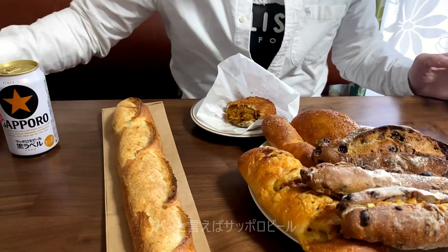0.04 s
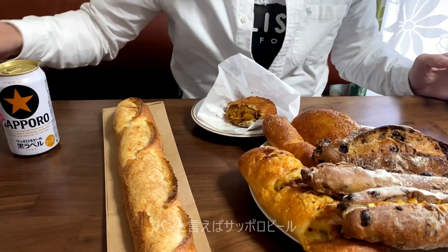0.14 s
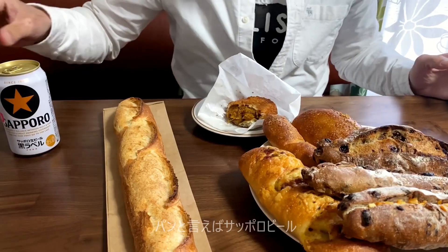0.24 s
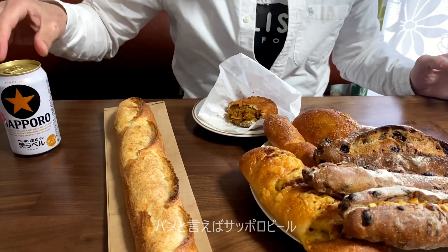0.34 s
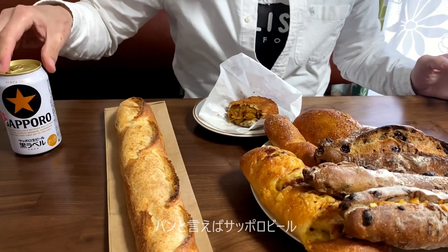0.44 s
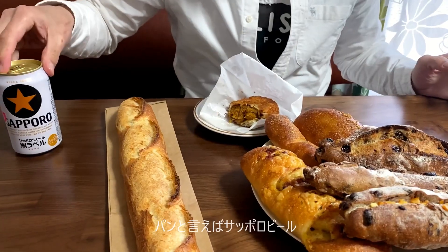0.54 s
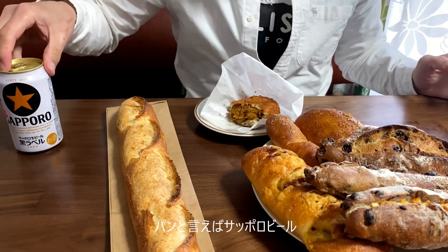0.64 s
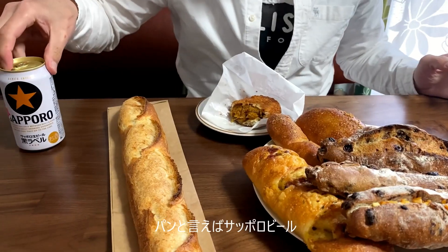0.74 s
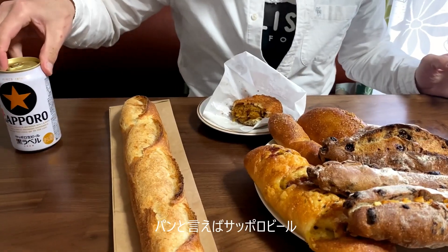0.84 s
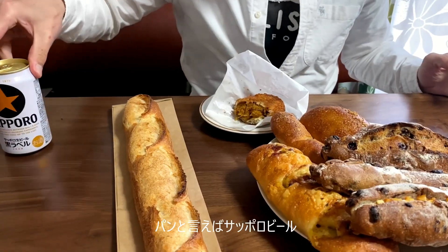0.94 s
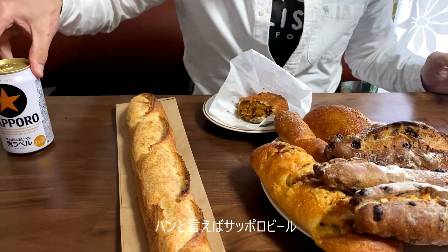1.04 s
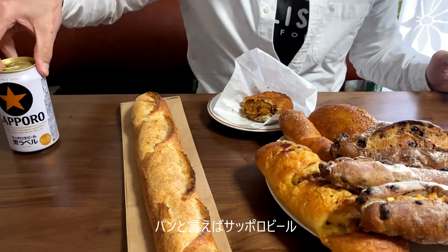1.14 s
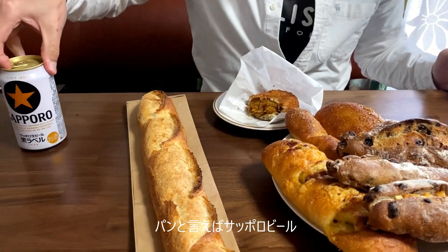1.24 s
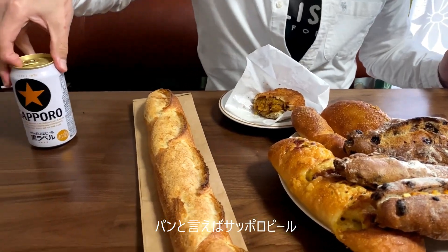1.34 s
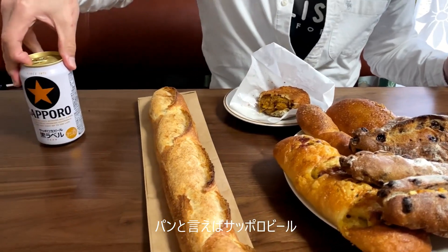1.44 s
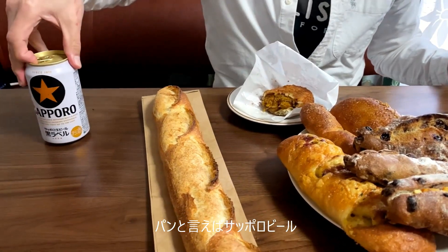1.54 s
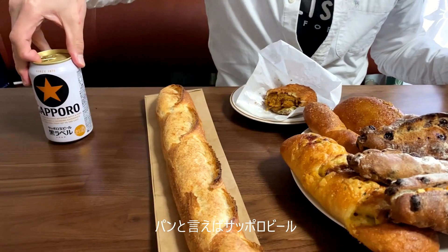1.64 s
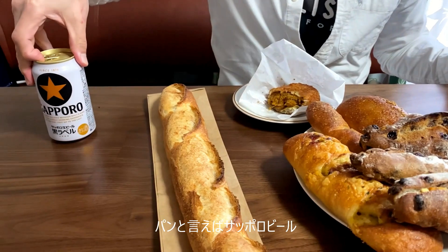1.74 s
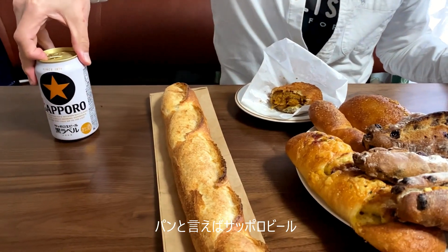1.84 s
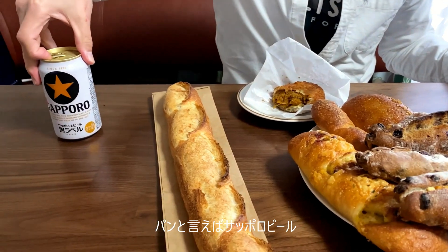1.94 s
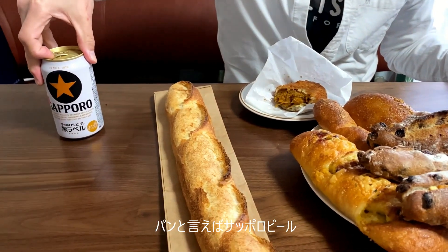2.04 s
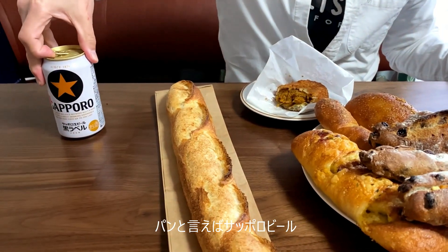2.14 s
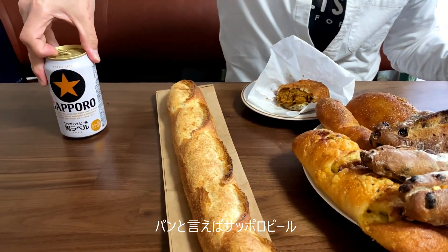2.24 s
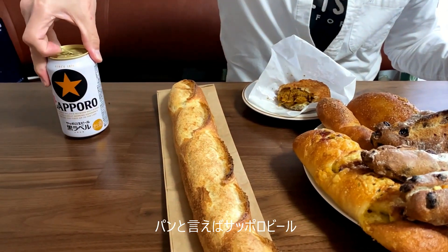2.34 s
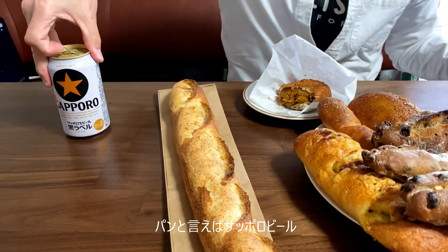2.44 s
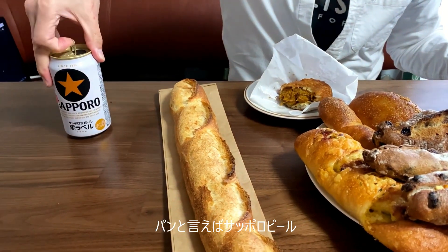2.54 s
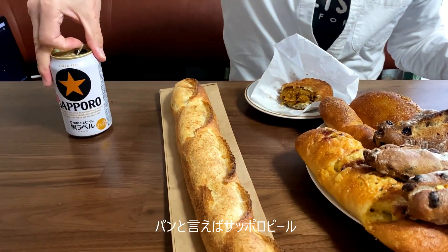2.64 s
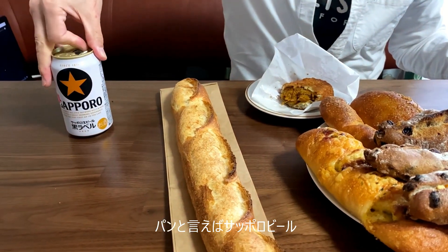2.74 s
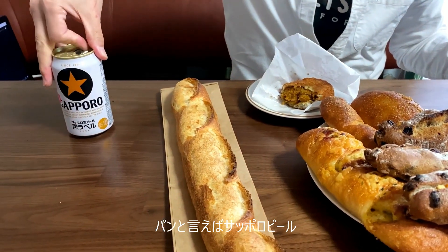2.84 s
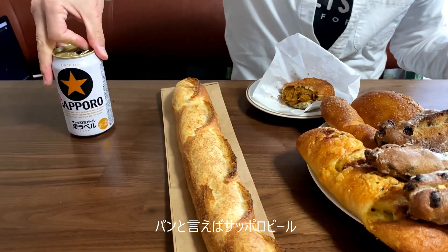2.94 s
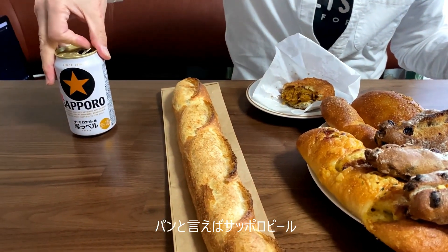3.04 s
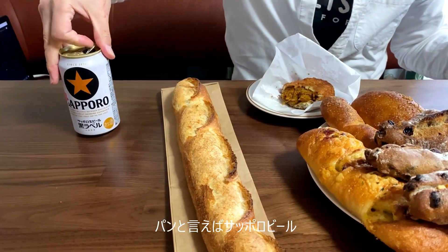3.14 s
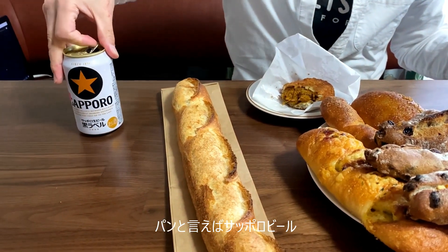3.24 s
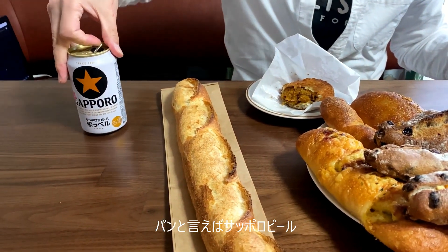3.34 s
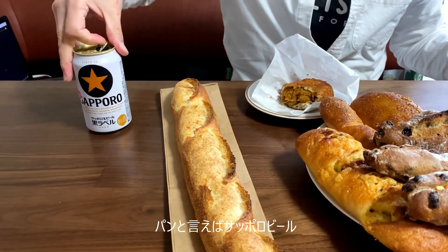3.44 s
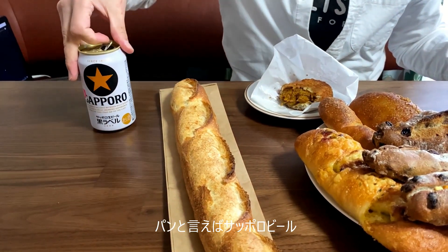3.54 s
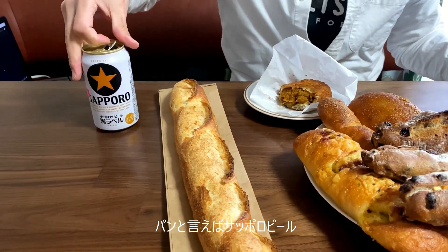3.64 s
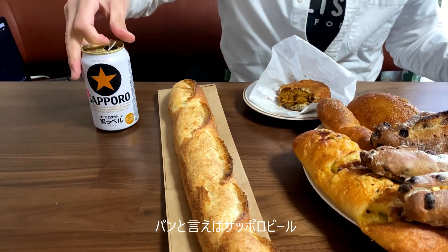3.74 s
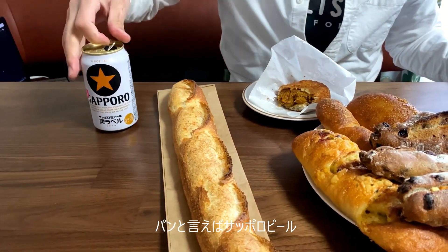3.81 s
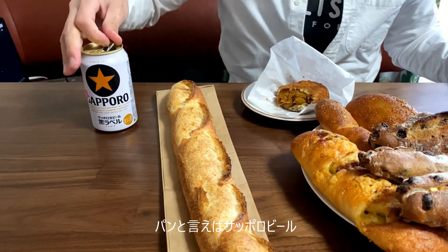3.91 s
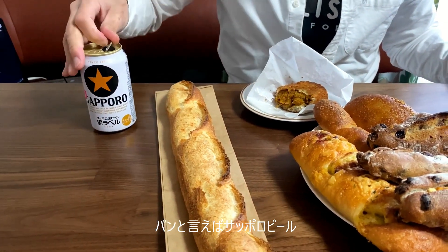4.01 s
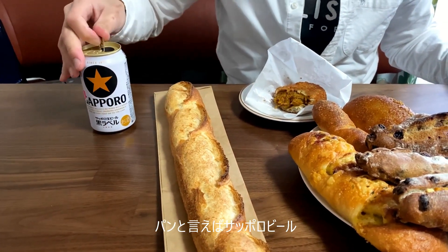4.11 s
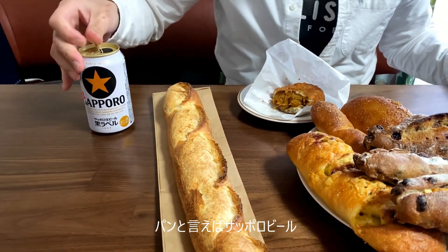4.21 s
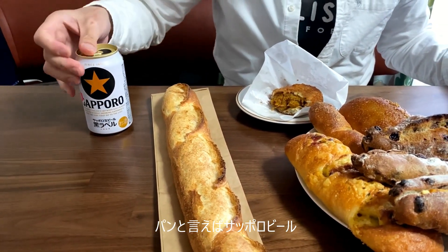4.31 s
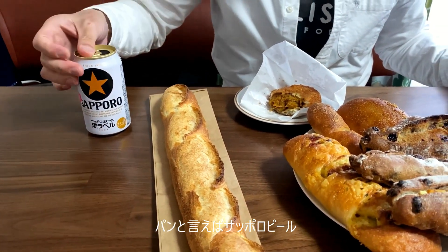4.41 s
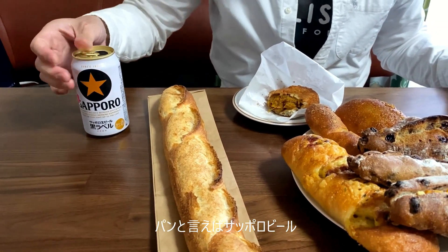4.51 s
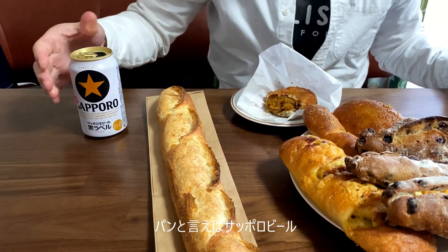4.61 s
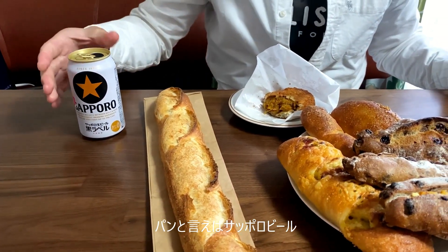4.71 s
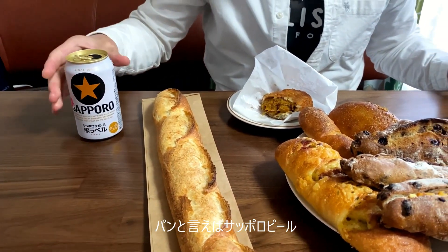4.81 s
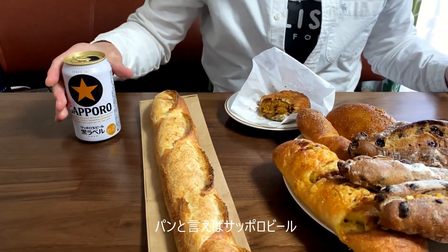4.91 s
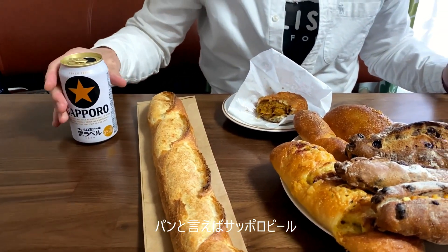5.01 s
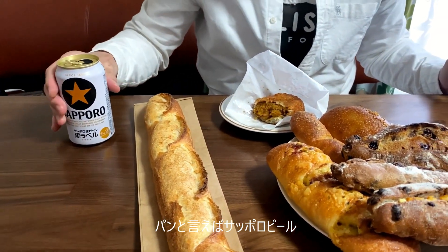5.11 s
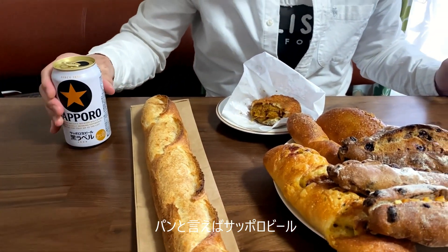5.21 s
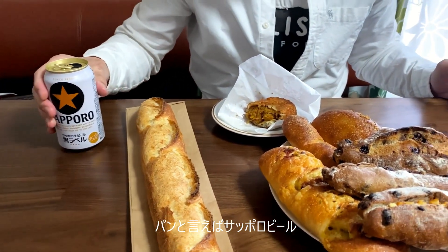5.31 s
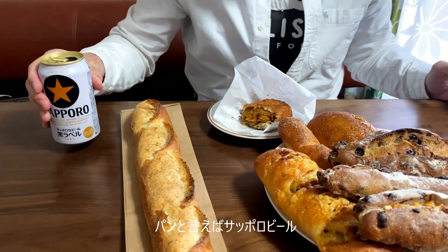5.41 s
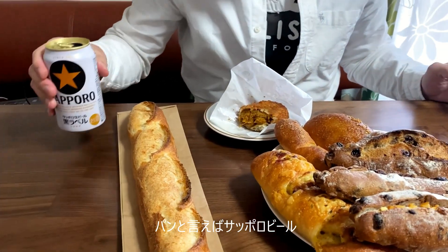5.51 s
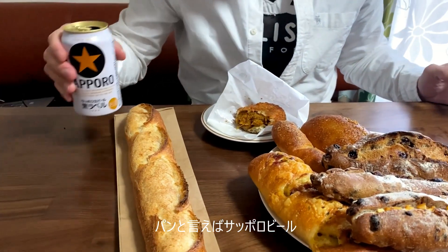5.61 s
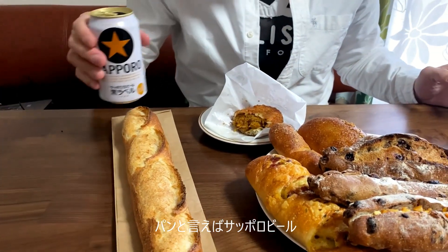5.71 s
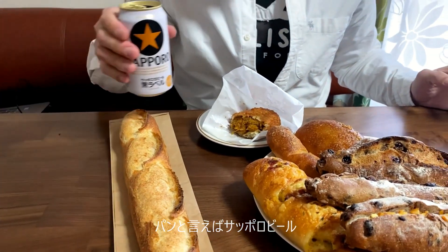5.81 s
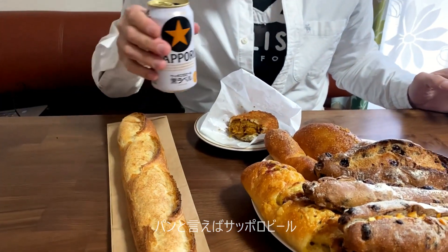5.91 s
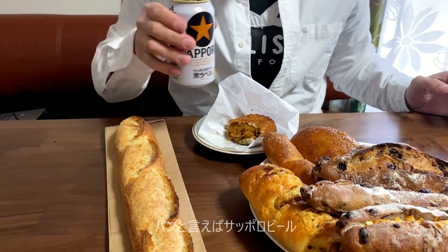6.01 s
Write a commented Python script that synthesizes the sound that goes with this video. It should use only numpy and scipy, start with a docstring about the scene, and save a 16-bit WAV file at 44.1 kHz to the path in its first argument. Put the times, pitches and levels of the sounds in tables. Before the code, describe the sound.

Close up in a small quiet room, fingers tap a full metal can and slide it across a wooden table with a scrape and low judder. After a pause, the tab breaks the seal with a brief bright hiss and pop, then the flap tears with loud hollow snaps and a table thud. Lighter ticks and another soft slide follow. A nearby stereo phone microphone catches short room echoes.

```python
"""Small room, wooden table: a beer can is gripped and slid, then its tab is levered open.
The seal cracks, gas hisses out, the lid pops, then the scored flap tears and snaps into the hollow can.
Fingers tick on the thin wall and the can is slid again. Short noise bursts excite resonances for the touches
and snaps; shaped noise makes the slides, gas and room rumble. A phone with two ports hears can and echoes."""
import sys
import numpy as np
from scipy import signal
from scipy.fft import rfft, irfft, next_fast_len
from scipy.io import wavfile
from scipy.ndimage import uniform_filter1d

SR = 44100
rng = np.random.default_rng(int(sys.argv[2]) if len(sys.argv) > 2 else 0)


def store_pcm(level_fs):
    """Save levels as 16-bit WAV."""
    pcm = np.round(np.clip(level_fs, -1, 1) * 32767).astype(np.int16)
    wavfile.write(sys.argv[1], SR, np.atleast_2d(pcm).T)


N = 267157
T = np.arange(N) / SR

# lid resonances: f/Hz, width/Hz, relative level/dB
LID_MODES = [(1330, 110, -6), (1415, 32, 0), (1610, 54, -4.5), (1780, 180, -6), (2420, 20, -11),
             (2954, 70, -1), (3129, 54, 2.5), (3430, 90, -6.5), (3535, 35, -3.5), (3690, 20, 3),
             (5100, 190, -9.5), (5520, 200, -9.5)]
# resonances of the can's foot on the wood: f/Hz, width/Hz, relative level/dB
FOOT_MODES = [(213.3, 59, -2), (367, 33, 4), (460, 45, 0.5), (705, 117, -4), (844, 47, -24),
              (1177, 150, -12.5), (1520, 86, -8.5), (1640, 76, -27), (2230, 220, -15), (2620, 220, -33),
              (3170, 83, -54), (3500, 83, -43), (4830, 160, -17.5), (6600, 640, -37), (7400, 240, -39)]


def undb(db):
    """Decibels to gain."""
    return 10 ** (np.asarray(db) / 20)


def unit(x):
    """Scale to rms 1."""
    return x / np.sqrt(np.mean(np.abs(x) ** 2))


def along(rows, hz):
    """Columns of a table, interpolated on a log-frequency axis."""
    f, *columns = np.transpose(rows)
    return [np.interp(np.log(hz), np.log(f), c) for c in columns]


def causal(gain):
    """Minimum-phase response with this gain at each frequency, by folding the cepstrum."""
    cepstrum = irfft(np.log(gain + 1e-9))
    half = cepstrum.shape[-1] // 2
    cepstrum[..., 1:half] *= 2
    cepstrum[..., half + 1:] = 0
    return irfft(np.exp(rfft(cepstrum)))


def grid(size=16384):
    """Bin frequencies in Hz, the lowest held at 1."""
    return np.maximum(np.arange(size // 2 + 1) * SR / size, 1)


def colour(points):
    """Unit-energy response of a (f/Hz, level/dB) spectrum."""
    level_db = along(points, grid())[0]
    return causal(unit(undb(level_db)))


def body(modes):
    """Unit-energy response of resonances whose powers add."""
    f = grid()
    power = 0
    for hz, width_hz, db in modes:
        detuning = (f * f - hz * hz) / (f * width_hz)
        power = power + undb(db) ** 2 / (1 + detuning ** 2)
    return causal(unit(np.sqrt(power)))


def through(x, response):
    """Convolve a pair of signals with a response."""
    return signal.oaconvolve(x, np.atleast_2d(response), axes=1)[:, :N]


def noise():
    """Two unrelated white noises."""
    return rng.standard_normal((2, N))


def walk(rate_hz):
    """Random values at rate_hz joined by straight lines, spread near 1."""
    steps = rng.standard_normal(4096)
    return 1.2 * np.interp(T * rate_hz, np.arange(len(steps)), steps)


def envelope(start_s, rise_s, end_s, t60_s):
    """Straight rise, hold until end_s, then exponential decay."""
    rise = np.clip((T - start_s) / rise_s, 0, 1)
    return rise * np.exp(-np.log(1000) * np.maximum(T - end_s, 0) / t60_s)


def crackles(events, size=8192, soft_ms=16, rise_ms=.3, grain_db=5):
    """Per event a burst of tiny slips with a flat spectrum; long rubs swell in and catch unevenly."""
    ms = np.array(events)[:, 1, None, None]
    age_ms = 1000 * np.arange(1, size + 1) / SR
    swell = (1 - np.exp(-age_ms / rise_ms)) * (age_ms / ms) ** (ms / soft_ms)
    shape = swell * np.exp(-age_ms / ms)
    catches = np.repeat(rng.standard_normal((len(events), 1, size // 32)), 32, axis=2)
    unevenness = undb(grain_db * catches * ms / soft_ms)
    spectra = rfft(rng.standard_normal((len(events), 2, size)) * shape * unevenness)
    power = uniform_filter1d(np.abs(spectra) ** 2, size=31)
    return irfft(spectra * rfft(causal(power ** -.5)))


def blows(events, bursts, levels_db):
    """Lay bursts at their times; a level is the rms of a burst spread over 10 ms."""
    out = np.zeros((2, N + bursts.shape[-1]))
    for row, burst, db in zip(events, bursts, levels_db):
        start = int(row[0] * SR)
        out[:, start:start + burst.shape[-1]] += burst * undb(db) * np.sqrt(SR / 100)
    return out[:, :N]


def ports(pair, hearing):
    """Blend two unrelated signals into left and right: alike, tilted and phase-shifted by frequency."""
    size = next_fast_len(N + 2048, real=True)
    alike, tilt_db, lead_rad = along(hearing, grid(size))
    alike = np.clip(alike, 0, 1)
    mid, side = rfft(pair, size) * np.sqrt([(1 + alike) / 2, (1 - alike) / 2])
    turn = undb(tilt_db / 2) * np.exp(.5j * lead_rad)
    return irfft(np.array([(mid + side) * turn, (mid - side) / turn]), size)[:, :N]


def quiet(level_db=-65):
    """The room's low rumble wavers under a faint steady hiss."""
    # quiet room: f/Hz, relative level/dB
    spectrum = [(20, -33), (48, -1), (66, 0.5), (105, -6), (200, -8), (300, -10.5), (440, -20), (900, -21),
                (2400, -25.5), (3200, -35.5), (6000, -39.5), (10000, -47.5), (16000, -49.5)]
    air = through(noise(), colour(spectrum))
    low = signal.sosfilt(signal.butter(2, 250, fs=SR, output="sos"), air)
    wavering = low * (undb(3.2 * walk(26)) - 1)
    return (air + wavering) * undb(level_db)


def table(force, late_s=.012):
    """The heavy top follows a push a moment later with a low thud from its resonances."""
    # table-top resonances: f/Hz, width/Hz, relative level/dB
    modes = [(81, 24, -4), (102, 33, -6.5), (131, 11, 0.5), (161, 23, -16.5)]
    late = np.array([np.interp(T - late_s, T, channel) for channel in force])
    return through(late, body(modes))


def touches():
    """Taps and rubs as rows of t/s, length/ms, contact pitch/Hz, ring/dB, tick/dB."""
    # finger or tab strikes the can: t/s, contact pitch/Hz, ring/dB, nail tick/dB
    taps = [(0.453, 1990, -59.5, -93), (0.523, 2400, -56.5, -75), (0.667, 3870, -56.5, -57.5),
            (0.735, 4530, -58, -61.5), (1.146, 4870, -75, -55.5), (2.261, 1720, -66, -90),
            (2.816, 6380, -52.5, -69.5), (4.035, 4990, -75, -76), (4.435, 6980, -56, -54),
            (4.5001, 4220, -53, -77.5), (4.61, 3350, -66, -77), (4.612, 860, -51.5, -77.5),
            (5.111, 1270, -62, -72.5), (6.014, 9305, -79, -62)]
    # fingertip drags over the can: t/s, length/ms, contact pitch/Hz, ring/dB
    rubs = [(1.817, 15.6, 5400, -74), (2.025, 19.5, 5700, -74.5), (3.692, 15, 1904, -47.5),
            (3.943, 8.9, 2498, -58), (4.17, 24, 1900, -59), (4.438, 8.3, 1690, -55.5),
            (4.487, 6.8, 2283, -55.5), (5.956, 11, 600, -61)]
    contact_cycles = 2.6  # tap length in periods of its contact pitch
    # a higher rub is more nail than skin: tick relative to ring, at 2 kHz
    scratch_db, scratch_db_per_octave = -17.5, 14.5
    rows = []
    for s, hz, ring_db, tick_db in taps:
        rows.append((s, 1000 * contact_cycles / hz, hz, ring_db, tick_db))
    for s, ms, hz, ring_db in rubs:
        tick_db = ring_db + scratch_db + scratch_db_per_octave * np.log2(hz / 2000)
        rows.append((s, ms, hz, ring_db, tick_db))
    return rows


def fingers(octaves=0.45, spill=0.021, thud_db=-8, foot_db=-11.5):
    """A touch rings the wall modes near its contact pitch; nails tick, the foot knocks, the table thuds."""
    # can wall resonances: f/Hz, width/Hz, relative level/dB
    wall_modes = [(465, 132.1, 0), (964, 30.7, 7.5), (1260, 260, 1), (1400, 180, -9), (2060, 200, -10),
                  (2240, 60, -6.5), (2520, 60, -0.5), (2890, 140, -1), (3385, 97, -11), (3743, 190, -4.5),
                  (4053, 79, -2), (4980, 310.3, -11), (6120, 90, -15.5), (7300, 203.6, -7.5),
                  (7860, 90, -6)]
    # nail on metal: f/Hz, relative level/dB
    tick_spectrum = [(300, -24.5), (2500, -13), (4500, -2), (7300, 7.5), (9000, 0), (11500, 4.5),
                     (16000, -2.5)]
    events = touches()
    bursts = crackles(events)
    _, _, pitch_hz, ring_db, tick_db = np.transpose(events)
    distance = np.log2(grid() / pitch_hz[:, None]) / octaves
    contact = np.exp(-.5 * distance ** 2) + spill  # spill reaches all modes
    wall = np.abs(rfft(body(wall_modes)))
    touched = causal(np.array([unit(c * wall) for c in contact]))
    rings = blows(events, signal.fftconvolve(bursts, touched[:, None], axes=2), ring_db)
    ticks = through(blows(events, bursts, tick_db), colour(tick_spectrum))
    foot = through(blows(events, bursts, ring_db + foot_db), body(FOOT_MODES))
    return rings + ticks + foot + table(blows(events, bursts, ring_db + thud_db))


def room(x, size=32768, scatter_s=0.00083, rise_s=0.0076):
    """Near surfaces send separate echoes; a diffuse tail decays at its own rate in each band."""
    # near surfaces: delay/ms, level/dB
    echoes = [(2.9, -15.5), (8.2, -17), (17.3, -14.5), (31, -18)]
    # tail: f/Hz, t60/s, level/dB
    tail = [(100, 0.84, -11.5), (300, 0.54, -7.5), (1100, 0.43, -4.5), (3000, 0.39, -5.5), (5500, .41, -6),
            (8510, 0.15, -15), (15000, .34, -15)]
    t, f = np.arange(size) / SR, grid(size)
    centres_hz = np.geomspace(60, 16000, 12)
    white = rfft(rng.standard_normal((2, size)))
    response = np.zeros((2, size))
    for share, t60_s, db in zip(np.eye(len(centres_hz)), *along(tail, centres_hz)):
        band = irfft(white * np.interp(np.log(f), np.log(centres_hz), share))
        decay = np.exp(-np.log(1000) * t / t60_s) * np.clip(t / rise_s, 0, 1)
        response += band * unit(decay) * undb(db) / np.sqrt(size)
    for ms, db in echoes:
        # furniture scatters each echo over a moment
        since_s = t - ms / 1000
        scatter = rng.standard_normal((2, size)) * (since_s > 0) * np.exp(-np.abs(since_s) / scatter_s)
        darkened = signal.lfilter([1], [1, -.45], scatter)
        response += unit(darkened) * undb(db) / np.sqrt(size)
    # the room's modes lie close, so no broad peak or hole stands out
    power = np.abs(rfft(response)) ** 2
    even = causal(np.sqrt(uniform_filter1d(power, size=601) / uniform_filter1d(power, size=31)))
    return through(x, irfft(rfft(response) * rfft(even)))


def push(start_s, length_s, db, skew=.82, shape=1.1):
    """Speed of one push of the hand: a skewed arch, speeding up sooner than it slows down."""
    progress = np.clip((T - start_s) / length_s, 0, 1)
    return undb(db) * np.abs(np.sin(np.pi * progress ** skew)) ** shape


def sliding(slide_db=-2, squeak_db=-16, fast_db=-47, brightening=1.0, sing_db=-14, judder_db=-1, grain_db=1.5):
    """The foot catches and slips on the wood, brighter with speed, its rim sings; pushed slowly, it judders."""
    # pushes over the wood: t/s, length/s, speed/dB
    slides = [(0.663, 0.18, -56.5), (0.881, 0.25, -47), (3.11, 0.45, -58), (3.432, 0.43, -55),
              (3.893, 0.99, -70)]
    # one slow, juddering push: t/s, length/s, speed/dB
    slow_push = (1.295, .305, -49.5)
    # juddering foot: f/Hz, relative level/dB
    judder_spectrum = [(24, -38), (40, -8.5), (112, -0.5), (314, -16.5), (450, -14.5), (623, -24),
                       (720, -30.5), (1380, -34.5), (3000, -40.5), (3900, -42.5), (6600, -120)]
    # squeak resonances: f/Hz, width/Hz, relative level/dB
    squeak_modes = [(5260, 140, 23.5), (6470, 410, 20.5), (9250, 230, -25.5), (10560, 2300, 11.5),
                    (15400, 3600, 5)]
    # rim pitch, drifting as the grip shifts: t/s, f/Hz
    rim_pitch = [(0.9, 2948), (1.1, 3172), (3.3, 3196), (3.45, 2942), (3.7, 2922)]
    speed = sum(push(*row) for row in slides)
    slips = unit(noise() * undb(grain_db * walk(600) + 0.087 * walk(35))) * speed
    scrape = through(slips, body(FOOT_MODES))
    squeak = through(slips * (speed / undb(fast_db)) ** brightening, body(squeak_modes))
    turns = np.cumsum(np.interp(T, *np.transpose(rim_pitch))) / SR
    wobble = through(noise(), body([(40.6, 114, 0)]))
    sing = unit(wobble * np.sin(2 * np.pi * turns)) * speed
    rumble = through(noise() * push(*slow_push) * undb(2 * walk(40)), colour(judder_spectrum))
    return undb(slide_db) * scrape + undb(squeak_db) * squeak + undb(sing_db) * sing + undb(judder_db) * rumble


def thuds(events, levels_db):
    """Single-sample pushes of the can into the table."""
    return table(blows(events, np.ones((len(events), 2, 1)), levels_db))


def presses(softness_hz=180):
    """The soft hand presses the can down and passes little treble, so the table thuds dully."""
    # presses: t/s, thud/dB ahead of the palm's low-pass
    leans = [(2.088, -45.5), (2.956, -53)]
    soft = signal.butter(2, softness_hz, fs=SR, output="sos")
    return signal.sosfilt(soft, thuds(leans, np.transpose(leans)[1]))


def opening(tear_s=2.565, sealed_hollow_db=-15.5, open_lid_db=-12):
    """Each snap rings lid and hollow, cracks, shoves the air and pushes the can into the table."""
    # lid gives way: t/s, length/ms, ring/dB (ahead of the sealed/open cuts), metal crack/dB, table thud/dB
    snaps = [(2.3002, 1.2, -46.5, -41.5, -46), (2.369, 2.1, -28, -24.5, -47),
             (2.3712, 2.6, -18.5, -29, -48.5), (2.521, 2, -29, -21, -39), (2.5738, 2.3, -18.5, -20, -25),
             (2.5761, 3.7, -20.5, -19.5, -38.5), (2.5915, 2.45, -21.5, -41, -38),
             (2.816, 1.94, -49, -49.5, -41)]
    # open can resonances: f/Hz, width/Hz, relative level/dB
    hollow_modes = [(265, 80, -14), (400, 45, -5), (451, 29, -3), (653, 50, -8), (927, 87, -2.5),
                    (1061, 25, -3.5), (1130, 43, 3.5), (1250, 50, 2.5), (1292.5, 60, 1.5), (1570, 70, -5),
                    (1896, 30, -6.5), (2010, 130, -2), (2720, 110, -8)]
    # tearing metal: f/Hz, relative level/dB
    crack_spectrum = [(200, -21), (1200, -13), (1800, -2), (2350, -1), (3000, -0.5), (4000, 4.5), (4500, 0),
                      (6800, -0.5), (8200, -6), (10000, -3), (12500, -5), (13500, -13.5), (16000, -8.5)]
    # the flap groans into the hollow as it starts to tear
    groan_db, groan_rise_s, groan_t60_s = -29.5, .006, .03
    # the flap shoves the air aside, a broad bark; level relative to the hollow's drive
    flap_hz, flap_width_hz, flap_db = 654, 600, -8
    bursts = crackles(snaps)
    s, _, ring_db, crack_db, thud_db = np.transpose(snaps)
    # sealed, the hollow is muffled; torn, the lid is
    torn = s > tear_s
    lid_db = ring_db + open_lid_db * torn
    hollow_db = ring_db + sealed_hollow_db * ~torn
    groan = noise() * envelope(tear_s, groan_rise_s, tear_s + groan_rise_s, groan_t60_s) * undb(groan_db)
    lid = through(blows(snaps, bursts, lid_db), body(LID_MODES))
    hollow = through(blows(snaps, bursts, hollow_db) + groan, body(hollow_modes))
    crack = through(blows(snaps, bursts, crack_db), colour(crack_spectrum))
    flap = through(blows(snaps, bursts, hollow_db + flap_db), body([(flap_hz, flap_width_hz, 0)]))
    return lid + hollow + crack + flap + thuds(snaps, thud_db)


def gas(flutter_db=1.04):
    """A thin leak whistles, then a fluttering jet rushes through the slit and shakes the lid until it pops."""
    # gas slit resonances: f/Hz, width/Hz, relative level/dB
    jet_modes = [(2020, 1500, -19.5), (3700, 900, -15.5), (6400, 800, -1.5), (8600, 640, -3.5),
                 (10630, 200, 0.5), (10150, 150, 5), (11460, 280, 5.5), (11790, 130, 4.5),
                 (12300, 900, -4.5), (14630, 200, 1.5), (14800, 1500, -2.5)]
    leak_s, jet_s, pop_s = 2.301, 2.311, 2.368
    leak_hz, leak_db, leak_rise_s, leak_t60_s = 3770, -36.5, .001, .06
    jet_db, jet_rise_s, jet_t60_s = -21, .036, .035
    fizz_db, fizz_t60_s = -52, .4
    shake_db, shake_growth_db_per_s, shake_t60_s = -32.5, 650, 0.07
    leak = undb(leak_db) * envelope(leak_s, leak_rise_s, jet_s, leak_t60_s)
    rush = undb(jet_db) * envelope(jet_s, jet_rise_s, pop_s, jet_t60_s)
    fizz = undb(fizz_db) * envelope(leak_s, leak_rise_s, pop_s, fizz_t60_s)
    growth_db = shake_db - shake_growth_db_per_s * np.maximum(pop_s - T, 0)
    shake = undb(growth_db) * envelope(jet_s, leak_rise_s, pop_s, shake_t60_s)
    whistle = through(noise(), body([(leak_hz, 250, 0)])) * leak
    jet = through(noise() * (rush + fizz) * undb(flutter_db * walk(400)), body(jet_modes))
    return whistle + jet + through(noise() * shake, body(LID_MODES))


def scene():
    """The can close by, the room all round."""
    # ports on the can: f/Hz, likeness/0-1, left minus right/dB, left lead/rad
    near = [(130, .95, -1, 0), (280, 0.03, 4, 0.64), (500, 0.4, 4, 1), (1170, .75, -2.5, 1.5),
            (2200, .35, 3, 1.85), (3260, .6, 4.5, 1.28), (5030, 0.4, 2, 1), (7030, 0.8, 1, 0.5),
            (10100, .95, -0.5, -4.9), (13400, 0.1, 0, -9.5), (15900, .95, 0, -13.5)]
    # ports on the room: f/Hz, likeness/0-1, left minus right/dB, left lead/rad
    diffuse = [(100, 0.99, 0.27, 0), (200, 0.76, 0.0083, 0.0037), (350, 0.75, 1, 0.0015),
               (700, 0.41, 0, 0.0068), (1800, 0.034, 1, 0.0068), (4000, 0.2, 2, 0), (8000, 0.045, 0.12, 0)]
    can = opening() + gas() + fingers() + sliding() + presses()
    return ports(can, near) + ports(room(can) + quiet(), diffuse)


def record(dry, top_hz=15900):
    """The phone cuts the top with a steep low-pass."""
    return signal.sosfilt(signal.ellip(10, .2, 80, top_hz, fs=SR, output="sos"), dry)


dry = scene()
out = record(dry)
store_pcm(out)
```